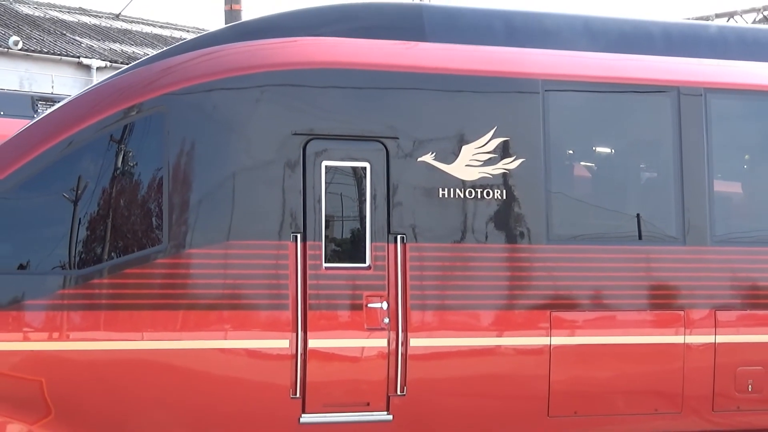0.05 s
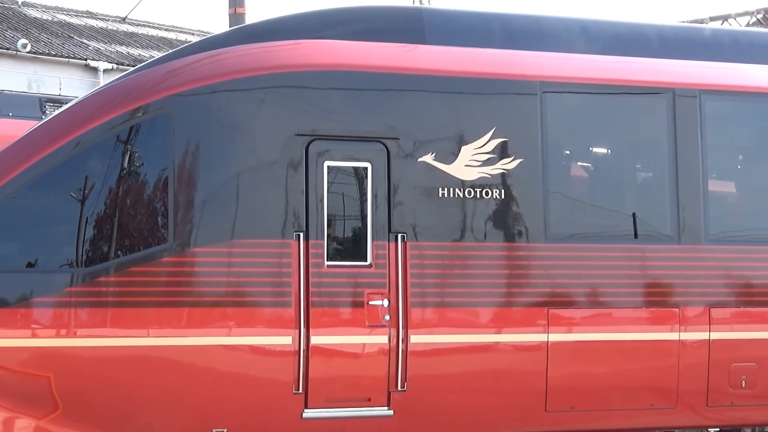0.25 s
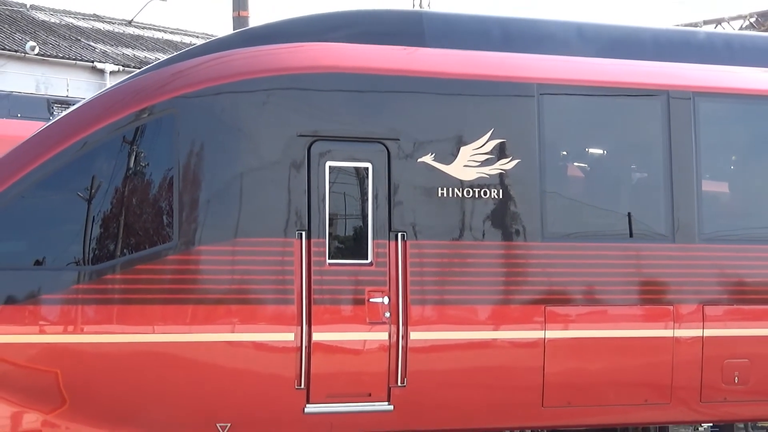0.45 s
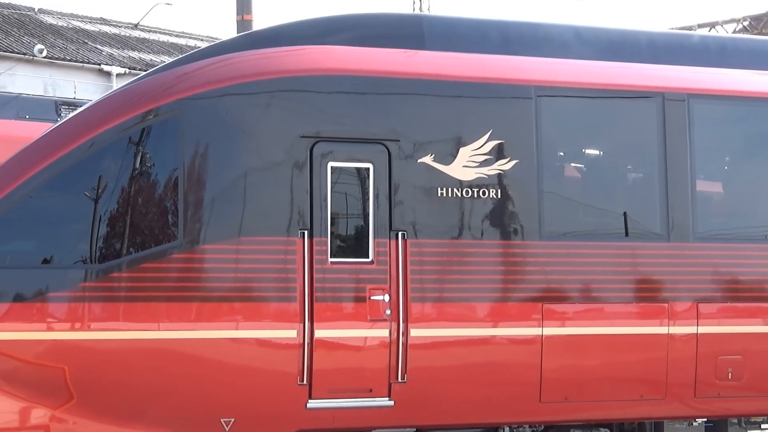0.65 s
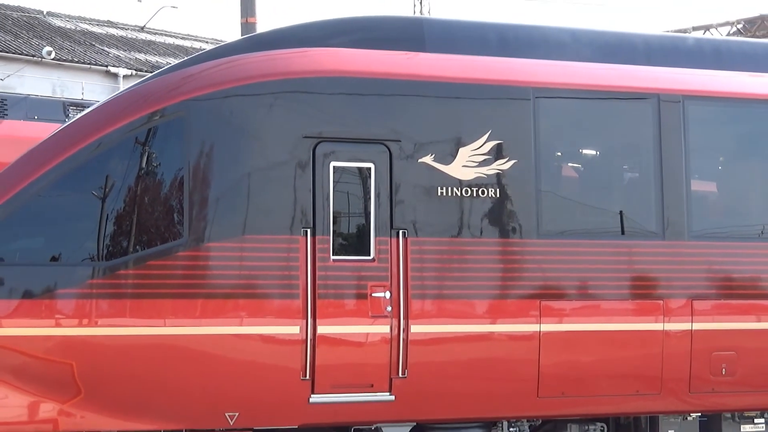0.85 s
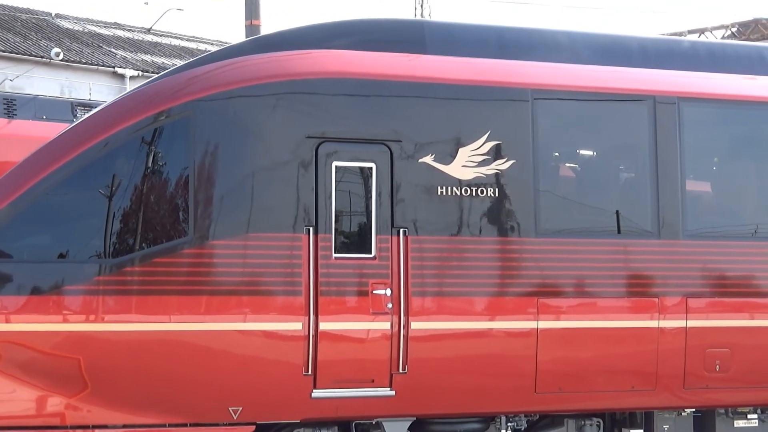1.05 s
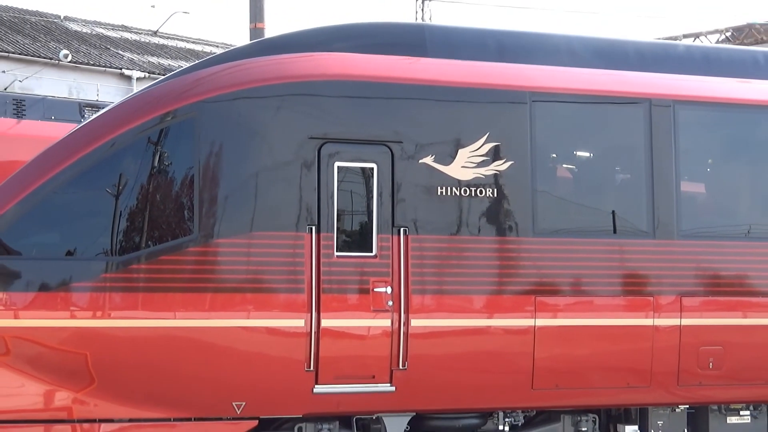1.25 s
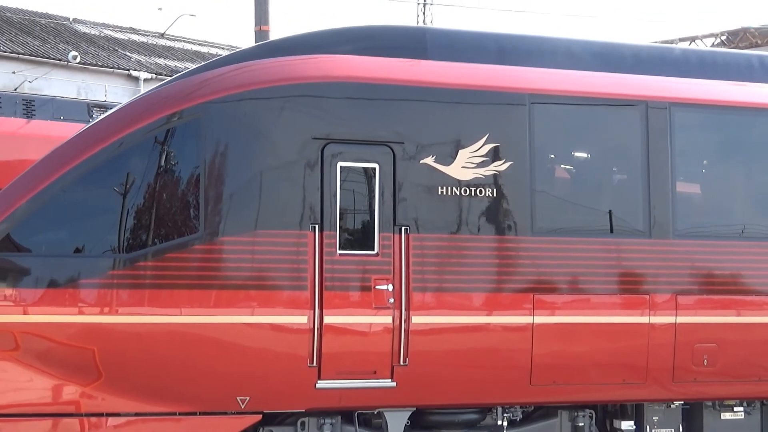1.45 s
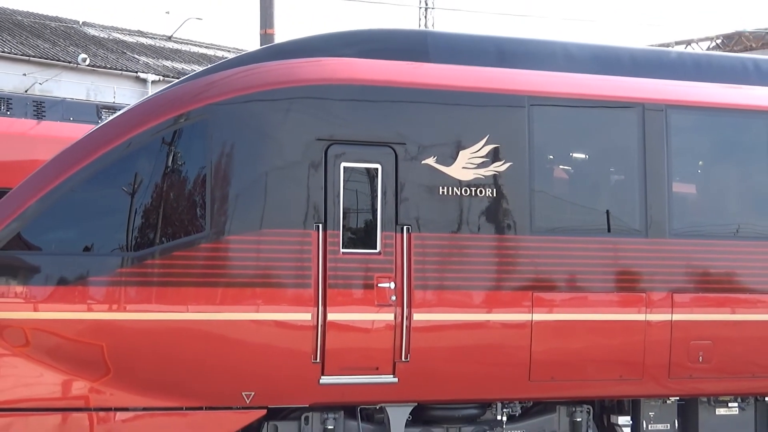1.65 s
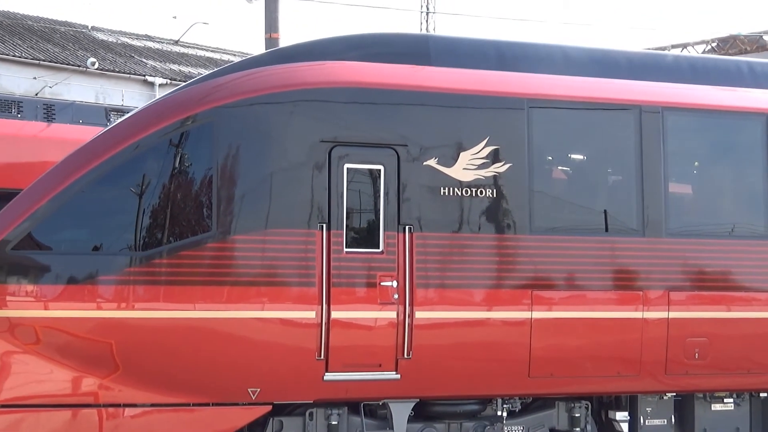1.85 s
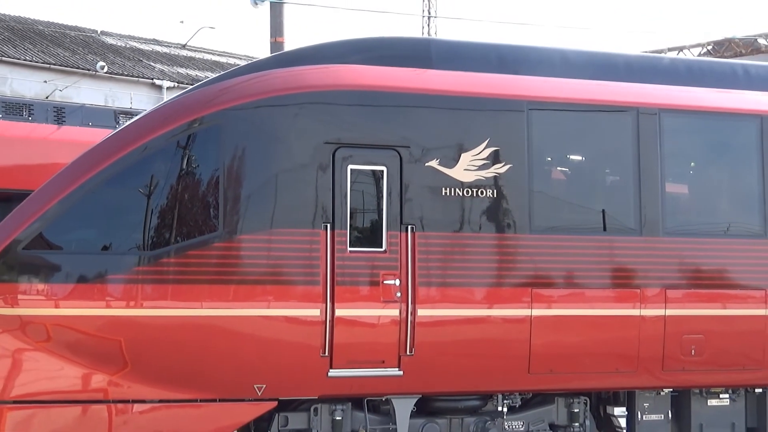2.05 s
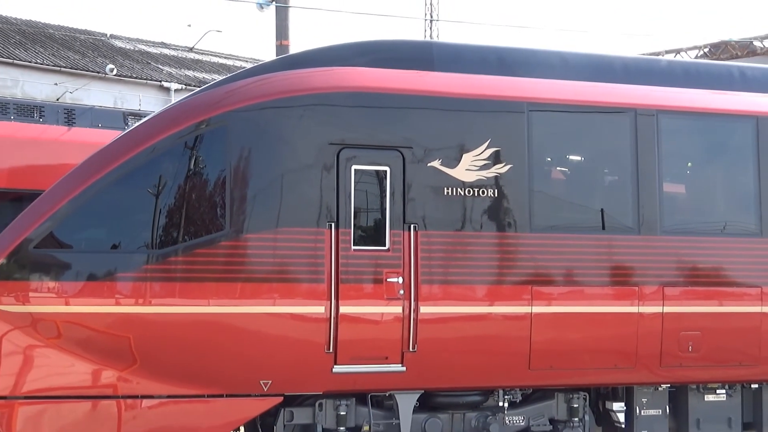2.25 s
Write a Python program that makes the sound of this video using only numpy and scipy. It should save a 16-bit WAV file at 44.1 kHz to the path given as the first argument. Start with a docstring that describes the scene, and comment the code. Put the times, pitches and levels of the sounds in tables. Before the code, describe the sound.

Heavy metal clanks twice, echoing off parked trains, with light wind on the microphone.

```python
"""Steel clanks in a rail yard

Two heavy steel clanks sound a little to the right. Each one strikes, rebounds and echoes twice
off trains and sheds: a noisy clash plus ringing tones. Wind thumps on the microphone over a low
rumble. A faint pulsing hiss, probably an insect, stops after the second clank; a tiny tick follows."""
import sys
import numpy as np
from scipy import signal
from scipy.fft import rfft, irfft
from scipy.io import wavfile
from scipy.ndimage import uniform_filter1d

SR = 44100
rng = np.random.default_rng(int(sys.argv[2]) if len(sys.argv) > 2 else 0)


def bounce(signal):
    """Save signal as a 16-bit WAV file at the path given by the first command-line argument."""
    frames = np.transpose(np.atleast_2d(signal))
    limited = np.clip(frames, -1, 1)
    pcm = np.round(limited * 32767).astype(np.int16)
    wavfile.write(sys.argv[1], SR, pcm)


N = 101429

# Tone of the distant rumble and air: pitch_hz, relative_db
RUMBLE_TONE = [(20, -23), (45, -4), (95, 3.5), (150, -4), (260, -2), (450, -13.5), (1000, -16),
               (1600, -19.5), (2500, -28), (5000, -37.5), (10000, -39), (16000, -41.5)]
# Where the rumble sits: pitch_hz, left_minus_right_db
RUMBLE_BALANCE = [(100, -4.9), (200, -1), (450, -5), (1300, -4), (4400, 0)]
# Tone of the insect's hiss: pitch_hz, relative_db
INSECT_TONE = [(3000, -51), (6000, 0), (8000, -2.5), (10500, 6), (13000, 10.5), (16000, 11)]
# Puffs of wind: peak_s, level_db, pitch_hz, swell_s
WIND_PUFFS = [(0.02, -64, 88, 0.0042), (0.092, -36, 116, 0.033), (0.245, -28.5, 119, 0.014),
              (0.297, -33, 77.5, 0.015), (0.37, -25, 124, 0.016), (0.408, -27.5, 78, 0.012),
              (.46, -26, 114, 0.021), (0.498, -22, 171, 0.0086), (.53, -30, 159, 0.025),
              (0.72, -29.5, 110, .007), (0.809, -27.5, 111, 0.021), (0.898, -30, 95, 0.032),
              (1.192, -28, 75, 0.0098), (1.338, -26.5, 75, 0.017), (1.408, -27, 87, 0.033),
              (1.613, -28.5, 76, 0.072), (1.669, -26, 77, 0.014), (1.69, -19.5, 107, 0.017),
              (1.744, -30.5, 139, 0.011), (1.777, -26, 80, 0.003), (1.864, -27, 75, 0.013),
              (1.935, -36.5, 54.6, 0.012)]
# Four hits per clank (strike, rebound, near echo, far echo). A fade is the time to drop by 60 dB.
# start_s, clash_db, ring_db, tilt_db_per_octave, body_db, clash_rise_s, clash_fade_s
HITS = [(0.7219, -19.5, -26.5, 0, -3, 0.0037, 0.3), (0.774, -19, -32.5, -2.5, -4.5, 0.0013, 0.095),
        (.852, -20.5, -32, -2.6, 0, 0.0027, 0.29), (.92, -18, -36, -3.5, -6, 0.022, 0.21),
        (1.3117, -17, -21, 0.47, 3.5, 0.0099, 0.35), (1.363, -13, -25, -1.3, -5.5, 0.0044, 0.2),
        (1.440, -15.5, -41, -1.9, 1.5, 0.0013, 0.19), (1.565, -29.5, -35, -3, 2.5, 0.0081, 0.48)]
# Tone of the clash, the steel's many weak vibrations heard together: pitch_hz, relative_db
CLASH_TONE = [(120, -22), (200, -4.5), (330, -7), (480, -6.5), (700, -3), (1150, 0), (1650, -4), (2000, -9),
              (3300, -12.5), (4700, -19), (6200, -16.5), (9000, -27), (12000, -36.5), (16000, -59)]
# The wash of sound that lingers in the yard: pitch_hz, relative_to_clash_db, fade_s
YARD_TAIL = [(150, -6, 0.42), (490, -3, 0.78), (1160, -13, 0.76), (2800, -0.5, 0.74), (6000, -10.5, 0.44),
             (14000, -9, 0.37)]
# The steel's strong ringing tones: pitch_hz, relative_db, fade_s
STEEL_TONES = [(363, -12, .7), (610, -9, .7), (697, -5, .9), (759, -12, .6), (915, -10, .4), (999, -4, .45),
               (1137, 2, .8), (1175, -8, .5), (1216, -10, .5), (1280, -2, .5), (1346, -8, .7),
               (1410, -11, .6), (1514, -10, .5), (1650, -5, .45), (1731, -11, .5), (1929, -14, .5),
               (2157, -14, .55), (2282, -14, .5), (2558, -12, .6), (5740, -24, .35)]
# Where the clanks sit: pitch_hz, left_minus_right_db
CLANK_BALANCE = [(150, 0), (330, -4), (700, -6.5), (1300, -6.5), (2400, -3.5), (4400, 1), (12000, -1)]

TILT_PIVOT_HZ, ATTACK_S = 1170, 0.001


def gain(db):
    """Turn decibels into a number to multiply by."""
    return 10 ** (np.asarray(db) / 20)


def look_up(hz, table, column=1):
    """Read a table at any pitch, blending between its rows."""
    table = np.array(table, float)
    return np.interp(np.log(np.maximum(hz, 1)), np.log(table[:, 0]), table[:, column])


def pitches():
    """The frequency in Hz of each point in the sound's spectrum."""
    return np.maximum(np.arange(N // 2 + 1) * SR / N, 1)


def noise(tone):
    """Noise of strength 1; tone says how much of each pitch it holds."""
    x = irfft(rfft(rng.standard_normal(N)) * tone, N)
    return x / x.std()


def stereo_noise(tone, width):
    """Noise for two ears; more width makes them differ more."""
    return noise(tone) + width * noise(tone) * np.array([[1], [-1]])


def place(sound, balance):
    """Share each pitch between the left and right ear."""
    ears = gain(look_up(pitches(), balance) * np.array([[.5], [-.5]]))
    return irfft(rfft(sound) * ears / ears.mean(axis=0), N)


def wander(rate_hz):
    """A smooth random drift, about 1 in size."""
    return noise(1 / (1 + (pitches() / rate_hz) ** 4))


def burst(age, rise_s, fade_s):
    """A level that rises quickly, then dies away."""
    age = np.maximum(age, 0)
    return (1 - np.exp(-age / rise_s)) * np.exp(-np.log(1000) * age / fade_s)


def rumble():
    """Distant machines and air make a low noise whose bass flutters slightly."""
    steady = stereo_noise(gain(look_up(pitches(), RUMBLE_TONE)), width=0.033)
    bass = irfft(rfft(steady) / (1 + (pitches() / 400) ** 2), N)
    flutter = gain(-0.86 * wander(rate_hz=19)) - 1
    return gain(-37.5) * place(steady + bass * flutter, RUMBLE_BALANCE)


def insect(t, stroke_hz=17.15, stop_s=1.629, release_s=.02):
    """A thin hiss swells with every wing stroke, then stops."""
    strokes = stroke_hz * (t - stop_s) + 0.05 * wander(rate_hz=2)
    throb = 1 - .24 * np.cos(2 * np.pi * strokes)
    singing = np.clip((stop_s - t) / release_s, 0, 1)
    hiss = stereo_noise(gain(look_up(pitches(), INSECT_TONE)), width=.3)
    return gain(-55) * throb * singing * hiss


def wind(t):
    """Short swirls of air thump on the microphone, nearly the same in both ears."""
    out = 0
    for peak_s, db, hz, swell_s in WIND_PUFFS:
        octaves_away = abs(np.log2(pitches() / hz))
        thump = gain(-20 * np.maximum(octaves_away - 0.73, 0))  # flat top, then 20 dB less per octave
        faint_hiss = gain(-67) / (1 + pitches() / 1000)
        swell = 1 / np.cosh(np.clip((t - peak_s) / swell_s, -20, 20))
        puff = swell * stereo_noise(thump + faint_hiss, width=0.096)
        even_out = np.sqrt(np.sum(swell ** 2) / np.sum(puff[0] ** 2))  # cancel chance changes in level
        out = out + gain(db) * puff * even_out
    return out


def steel_ripple(spacing_hz=18, ripple_db=2.8):
    """The steel's crowded weak vibrations leave peaks and gaps in its tone, the same for every hit."""
    spots = np.arange(0, SR / 2, spacing_hz)
    peaks = gain(ripple_db * np.clip(rng.standard_normal(len(spots)), -2, 2))
    nearby_level = np.sqrt(uniform_filter1d(peaks ** 2, size=24))
    return np.interp(pitches(), spots, peaks / nearby_level)


def hit_colour_db(hz, tilt_db, body_db, body_hz=600, body_octaves=.55):
    """Tilt makes a hit brighter or duller; body makes its middle pitches fuller or thinner."""
    body = np.exp(-(np.log2(hz / body_hz) / body_octaves) ** 2 / 2)
    return tilt_db * np.log2(hz / TILT_PIVOT_HZ) + body_db * body


def steel_clash(t, yard_rise_s=0.027):
    """Each hit sets off a noisy crowd of vibrations, whose sound lingers in the yard."""
    tone = gain(look_up(pitches(), CLASH_TONE)) * steel_ripple()
    direct_spectrum = rfft(stereo_noise(tone, width=0.25))
    tail_spectrum = rfft(stereo_noise(tone, width=0.21))
    coarse_t, out = t[::16], 0
    for hz in 125 * 2. ** np.arange(8):  # one octave at a time
        damping = (hz / TILT_PIVOT_HZ) ** -0.019  # high pitches fade a little sooner
        tail_gain, tail_fade_s = gain(look_up(hz, YARD_TAIL)), look_up(hz, YARD_TAIL, column=2)
        direct_power = tail_power = 0
        for start_s, clash_db, _, tilt_db, body_db, rise_s, fade_s in HITS:
            size = gain(clash_db + hit_colour_db(hz, tilt_db, body_db))
            age = coarse_t - start_s
            direct_power += (size * burst(age, rise_s, fade_s * damping)) ** 2
            tail_power += (size * tail_gain * burst(age, yard_rise_s, tail_fade_s)) ** 2
        band = np.maximum(1 - abs(np.log2(pitches() / hz)), 0)
        for spectrum, power in ((direct_spectrum, direct_power), (tail_spectrum, tail_power)):
            out = out + irfft(spectrum * band, N) * np.interp(t, coarse_t, np.sqrt(power))
    return out


def steel_ring(t):
    """The steel's strongest vibrations ring on as pure tones after each hit."""
    out = np.zeros(N)
    for start_s, _, ring_db, tilt_db, body_db, _, _ in HITS:
        first = int(start_s * SR)
        age = t[:min(N - first, SR)]  # at most one second
        for (hz, tone_db, fade_s), phase in zip(STEEL_TONES, rng.random(len(STEEL_TONES))):
            size = gain(ring_db + tone_db + hit_colour_db(hz, tilt_db, body_db))
            wave = np.sin(2 * np.pi * (hz * age + phase))
            out[first:first + len(age)] += size * burst(age, ATTACK_S, fade_s) * wave
    return out


def tick(t, start_s=1.698, pitch_hz=10000):
    """One faint, bright tick of noise."""
    bright = noise(1 / (1 + np.log2(pitches() / pitch_hz) ** 2))
    return gain(-50) * burst(t - start_s, ATTACK_S, fade_s=.07) * bright


def scene():
    """Add the clanks to the wind, rumble, insect and tick."""
    t = np.arange(N) / SR
    clanks = place(steel_clash(t) + steel_ring(t), CLANK_BALANCE)
    return clanks + wind(t) + rumble() + insect(t) + tick(t)


def record(dry):
    """The recorder cuts off the highest treble, above 15900 Hz."""
    return signal.sosfilt(signal.ellip(10, .1, 80, 15900, fs=SR, output="sos"), dry)


dry = scene()
out = record(dry)
bounce(out)
```